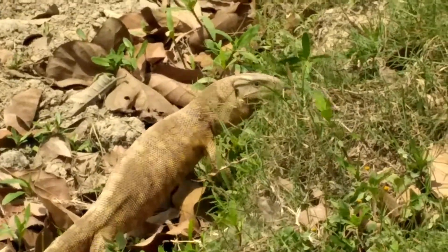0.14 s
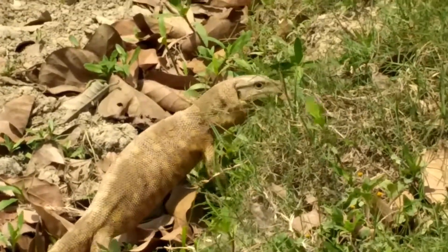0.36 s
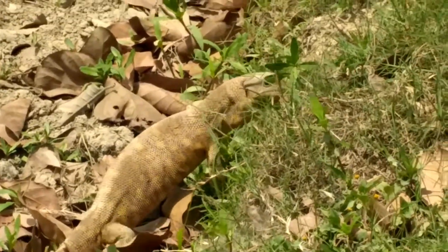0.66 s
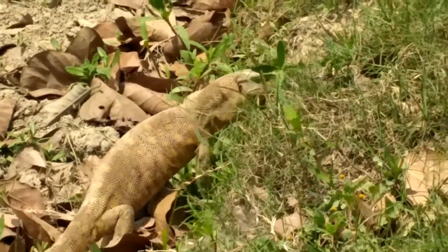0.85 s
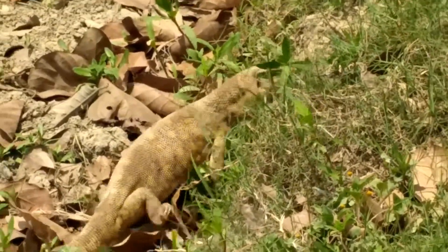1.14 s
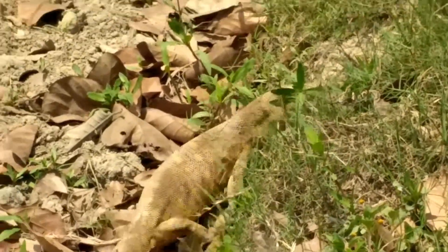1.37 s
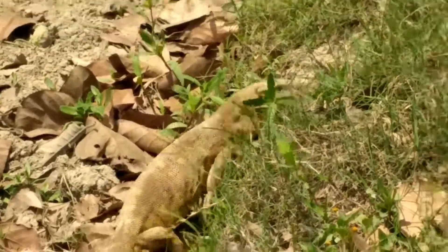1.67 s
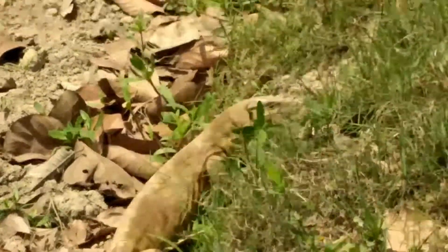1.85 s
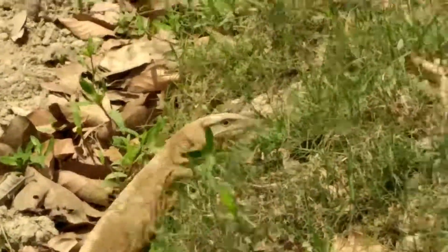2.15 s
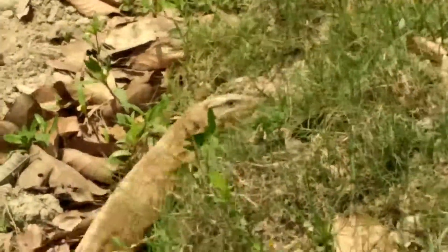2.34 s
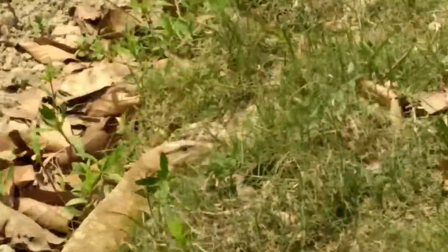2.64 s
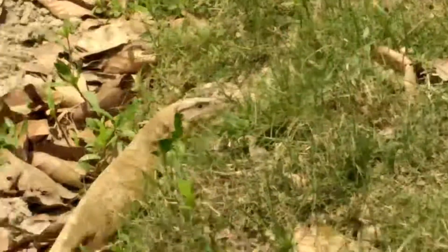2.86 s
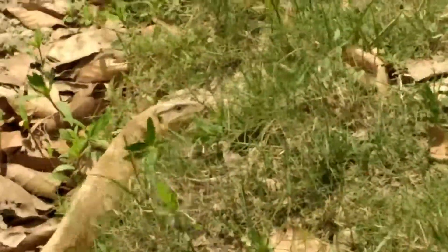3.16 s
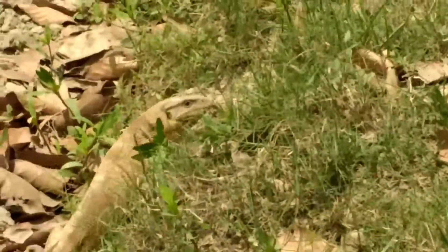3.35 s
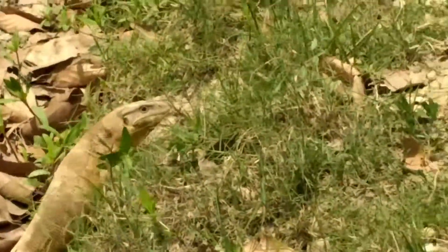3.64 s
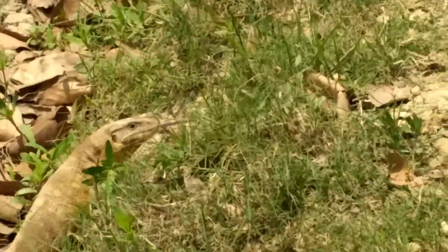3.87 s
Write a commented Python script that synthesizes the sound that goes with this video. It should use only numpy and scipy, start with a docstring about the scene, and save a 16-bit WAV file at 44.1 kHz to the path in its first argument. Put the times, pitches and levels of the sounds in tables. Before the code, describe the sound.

Dry leaves rustle and snap as a lizard crawls through grass outdoors: faint at first, a strong scrape after one second, scattered crackles later, while low wind thumps build on a single close microphone.

```python
"""A large lizard pushes through dry leaves and grass: shaped noise full of tiny crackles makes the scrapes,
short noise bursts with a rough ring make the leaf snaps, and decaying tones make one twig knock.
Gusts of wind buffet the single microphone in low lumpy bursts, made of noise in three bands.
Behind it all is a faint outdoor hiss of coloured noise that dips at times."""
import sys
import numpy as np
from scipy import signal
from scipy.fft import rfft, irfft, next_fast_len
from scipy.io import wavfile
from scipy.ndimage import uniform_filter1d, map_coordinates

SR = 44100
rng = np.random.default_rng(int(sys.argv[2]) if len(sys.argv) > 2 else 0)


def decibels_to_gain(level_db):
    """Convert a level in decibels to a linear amplitude gain (20 dB per decade)."""
    exponent = np.asarray(level_db, float) / 20
    return 10 ** exponent


def log_audio(samples):
    """Write samples as a 16-bit WAV file to the path given in sys.argv[1]."""
    # one column per channel
    frames = np.atleast_2d(samples).T
    # limit to full scale, then quantise
    limited = np.clip(frames, -1, 1)
    pcm = np.round(limited * 32767).astype(np.int16)
    wavfile.write(sys.argv[1], SR, pcm)


N = 176400  # samples, four seconds


def unit(x):
    """Scale to rms 1."""
    return x / np.sqrt(np.mean(x ** 2) + 1e-20)


def curves(rows):
    """Straight lines between the rows: one value per sample for each column after the time."""
    times, *columns = np.transpose(rows)
    t = np.arange(N) / SR
    return [np.interp(t, times, column) for column in columns]


def wobble(rate):
    """A smooth curve through random points, rate points a second (below 100)."""
    return map_coordinates(rng.standard_normal(400), [np.arange(N) * rate / SR])


def coloured(x, points):
    """Filter x to a spectrum of (Hz, dB) points; white noise of rms 1 keeps rms 1."""
    hz, db = np.transpose(points)
    size = next_fast_len(N + 8192)
    bins_hz = np.fft.rfftfreq(size, 1 / SR)
    # the points are joined along a logarithmic pitch axis
    gain = decibels_to_gain(np.interp(np.log(bins_hz + 1), np.log(hz + 1), db, left=-120, right=-120))
    return irfft(rfft(x, size) * unit(gain), size)[:N]


def even(x, window_s):
    """Noise with its own slow swells ironed out."""
    level = uniform_filter1d(x ** 2, int(window_s * SR))
    return unit(x / np.sqrt(np.abs(level) + 1e-9))


# Leaves dragged by the body: (start [s], end [s], treble at start [dB], treble at end [dB],
# middle at start [dB], top over treble [dB])
DRAGS = [(0, 0.149, -67.5, -79.5, -78, -9.5), (0.46, 0.583, -68, -64, -78, -8),
         (0.588, 0.673, -62.5, -52.5, -69, -18), (0.668, 0.767, -66, -57.5, -69.5, 9.5),
         (0.879, 0.953, -55.5, -69, -77, 5.5), (1.238, 1.529, -41, -44, -63.5, -12),
         (1.546, 1.628, -55, -65.5, -73.5, 0), (1.641, 1.735, -48.5, -71.5, -71.5, 5.5),
         (1.737, 2.15, -76, -69, -83, -23), (2.17, 2.596, -63, -83.5, -78, -12),
         (2.904, 2.95, -53, -60.5, -75, -14.5), (2.956, 3.055, -51, -67.5, -75, 1),
         (3.066, 3.17, -69.5, -72.5, -75, -3.5), (3.141, 3.382, -54.5, -73, -70, -1),
         (3.419, 3.61, -65.5, -84.5, -75, 0.5), (3.609, 3.641, -49.5, -75, -67, 17.5),
         (3.662, 3.774, -58, -84.5, -75, 10.5), (3.78, 3.954, -83.5, -81, -99, -2)]
DRAG_ATTACK_S, DRAG_RELEASE_S = 0.005, 0.011  # time constants of the start and of the fade after the end
STILL_DB = -86.5  # level between drags


def drags():
    """Treble, middle and top level in dB: each drag starts quickly, fades or grows and dies off after its end."""
    t = np.arange(N) / SR
    gain = np.zeros((3, N))
    for start, end, first_db, last_db, middle_db, top_db in DRAGS:
        treble_db = np.interp(t, [start, end], [first_db, last_db])
        # the middle follows only a third of the treble's change
        bands_db = np.array([treble_db, middle_db + 0.33 * (treble_db - first_db), treble_db + top_db])
        attack = 1 - np.exp(np.minimum(start - t, 0) / DRAG_ATTACK_S)
        release = np.exp(np.minimum(end - t, 0) / DRAG_RELEASE_S)
        gain += attack * release * decibels_to_gain(bands_db)
    return 20 * np.log10(gain + decibels_to_gain(STILL_DB))


# Grass blades brushing, a narrow sizzle: (time [s], level [dB])
GRASS = [(.66, -87), (.68, -69), (.8, -71), (.83, -89.5), (1.23, -89), (1.25, -54.5), (1.52, -69),
         (1.54, -97), (2.23, -75), (2.45, -82), (2.87, -98), (2.89, -64.5), (3.33, -58), (3.4, -73.5),
         (3.79, -70), (3.83, -101)]
# Tone of the bright scrape, also used by the snaps: (frequency [Hz], relative level per Hz [dB])
TREBLE_TONE = [(4410, -41), (7500, -5), (8360, -3), (9560, 2.5), (10900, 1.5), (12700, 8.5), (15100, 0),
               (15800, 6)]
# Tone of the duller scrape: (frequency [Hz], relative level per Hz [dB])
MIDDLE_TONE = [(760, -57), (1300, -12.5), (2850, -9.5), (3350, -5.5), (3840, -3.5), (5000, -7),
               (6500, -17.5), (11000, -120)]
# Tone of the thin fizz of the driest leaves: (frequency [Hz], relative level per Hz [dB])
TOP_TONE = [(11700, -26), (12100, 4), (13500, -1), (15800, -6)]
# Tone of the grass blades: (frequency [Hz], relative level per Hz [dB])
BLADES_TONE = [(4500, -42), (5000, -2), (6000, -4), (6300, -12), (7600, -9.5), (7900, -39)]
CRACKLES_PER_S, CRACKLE_SPREAD_DB = 250, 5  # average number drawn for each tone, spread of their sizes
CRACKLE_SHARE, CRACKLE_S = 0.34, 0.001  # part of the loudness that crackles, time constant of their decay


def rustle():
    """Leaves and grass rub: scraping noise that flares in tiny crackles of uneven size, in four tones."""
    levels_db = [*drags(), *curves(GRASS)]
    size_db = CRACKLE_SPREAD_DB * np.clip(rng.standard_normal((4, N)), -2, 2)
    crackles = decibels_to_gain(size_db) * (rng.random((4, N)) < CRACKLES_PER_S / SR)
    crackles = crackles + 0.43 * crackles[0]  # some crackles are heard in every tone
    flare = signal.lfilter([1], [1, -np.exp(-1 / (CRACKLE_S * SR))], crackles)
    loudness = CRACKLE_SHARE * unit(flare) + 1 - CRACKLE_SHARE
    rub = loudness * decibels_to_gain(2.8 * wobble(46)) * rng.standard_normal((4, N))
    tones = (TREBLE_TONE, MIDDLE_TONE, TOP_TONE, BLADES_TONE)
    return sum(coloured(unit(x) * decibels_to_gain(db), tone) for x, db, tone in zip(rub, levels_db, tones))


# Leaf snaps: (time [s], crack level before its rise and tone [dB], ring over crack [dB], ring pitch [Hz])
SNAPS = [(0.0839, -50.5, -3, 4090), (0.16, -54.5, 0, 3800), (0.292, -45, -18.5, 5370),
         (0.467, -29.5, -32, 4250), (0.5241, -34.5, -17, 4140), (0.5827, -56.5, 7, 4220),
         (0.6064, -38, -11, 3920), (0.6707, -35.5, 2, 3415), (0.6984, -38, -23, 4170),
         (0.749, -34, -15, 5530), (0.884, -34, -36, 3340), (0.908, -32, -28, 3600),
         (1.3016, -16, -21.5, 4570), (1.515, -29, -45, 3940), (1.5694, -31, -23, 2850),
         (1.6531, -18.5, -58, 4500), (1.714, -36, -32, 3580), (1.997, -30.5, -29, 3200),
         (2.166, -25.5, -20.5, 3630), (2.231, -36, -13, 5560), (2.304, -40, -30, 4360),
         (2.3602, -42.5, -4, 4420), (2.5599, -37, -18.5, 4160), (2.919, -32, -17.5, 5380),
         (2.9656, -22.5, -20.5, 5430), (2.9765, -30.5, -16, 5680), (3.0153, -39, -12, 4900),
         (3.023, -33.5, -11, 5100), (3.1558, -16, -20.5, 5370), (3.4286, -48, -5, 5200),
         (3.5035, -54.5, 10, 4350), (3.614, -32, -13, 4330), (3.6914, -45.5, -5, 5630),
         (3.7522, -48, -3, 4650), (3.8185, -45.5, -18.5, 4000)]
SNAP_RISE_S = 0.0029  # time constant of the rise
CRACK_S, LEAF_RING_S = 0.011, 0.021  # time to fall 60 dB


def snaps():
    """Each snap is a bright crack of noise and a short ring of the leaf, roughened by a jittery phase."""
    crack, ring = np.zeros((2, N + SR))
    t = np.arange(SR // 20) / SR
    rise = 1 - np.exp(-t / SNAP_RISE_S)
    for s, db, ring_db, hz in SNAPS:
        place = slice(round(s * SR), round(s * SR) + len(t))
        noise, jitter = rng.standard_normal((2, len(t)))
        crack[place] += decibels_to_gain(db - 60 * t / CRACK_S) * rise * noise
        phase = 2 * np.pi * hz * t + 0.26 * np.cumsum(jitter)
        ring[place] += decibels_to_gain(db + ring_db - 60 * t / LEAF_RING_S) * rise * np.sin(phase)
    ring_tone = [(1200, -28.5), (2000, -5.5), (7500, 1.0), (10000, -49.5)]
    return coloured(crack[:N], TREBLE_TONE) + coloured(ring[:N], ring_tone)


# Twig knock: (time [s], level that the parts below are set against [dB])
TWIG = [(2.417, -49.5)]
# Ringing tones of the wood: (frequency [Hz], level over the knock's [dB], time to fall 60 dB [s])
WOOD = [(1070, 6, 0.014), (1440, 8, 0.0094), (1770, 10, .012)]
SCUFF_DB, SCUFF_S = -3.5, 0.12  # grit against the knock's level before its tone, time to fall 60 dB


def twig():
    """A dull wooden knock of decaying sines with a short gritty scuff of noise behind it."""
    knock, grit = np.zeros((2, N))
    t = np.arange(SR // 5) / SR
    for s, db in TWIG:
        place = slice(round(s * SR), round(s * SR) + len(t))
        for hz, tone_db, fall_s in WOOD:
            knock[place] += decibels_to_gain(db + tone_db - 60 * t / fall_s) * np.sin(2 * np.pi * hz * t)
        grit[place] += decibels_to_gain(db + SCUFF_DB - 60 * t / SCUFF_S) * rng.standard_normal(len(t))
    grit_tone = [(900, -17.5), (1400, -0.5), (2500, -4.0), (4200, -14.5), (5000, -50.0)]
    return knock + coloured(grit, grit_tone)


# Steady wind on the microphone beneath the buffets: (time [s], rumble level [dB], flutter level [dB])
STEADY_WIND = [(0, -66, -84), (.25, -72, -91.5), (1.45, -62.5, -80), (2.1, -51, -68), (2.72, -37, -53),
               (2.9, -48.5, -78), (3.44, -38.5, -56.5), (3.52, -34, -43), (3.64, -36, -38),
               (3.75, -52.5, -56.5), (4, -61, -43.5)]
STEADY_BODY_DB = -11  # body of the steady wind over its rumble
# Buffets, eddies that strike the microphone: (peak time [s], body level [dB],
# rumble over body [dB], flutter over body [dB])
BUFFETS = [(0.03, -42, 3.5, -9.5), (0.323, -56.5, 5.5, -21), (0.472, -60, 14.5, -15),
           (0.523, -48.5, -3.5, -12.5), (0.636, -50, 1, -21), (0.721, -56, 3.5, -17), (0.892, -63, 5, -6),
           (1.064, -51, -15, -31), (1.123, -52, -8, -13), (1.22, -46.5, -2.5, -24), (1.288, -47, 5.5, -18),
           (1.326, -43.5, -34, -6), (1.511, -61, -21, 14.5), (1.542, -56.5, -14, 9), (1.573, -43.5, 1, -14),
           (1.616, -38.5, 4.5, -31), (1.707, -56.5, 20.5, -28), (1.848, -51, 10, -10),
           (1.873, -32.5, 10, -21), (1.97, -41, 6, -18), (2.033, -25, -2.5, -13.5),
           (2.072, -27.5, 3, -11.5), (2.141, -31.5, 4, -17), (2.192, -34.5, 6, -19.5),
           (2.268, -36, 10.5, -9), (2.355, -24, 3, -18), (2.406, -29, 0.5, -10.5), (2.467, -31, 0.5, -19),
           (2.542, -45, 12.5, -23), (2.611, -34.5, 3, -11.5), (2.668, -39.5, 9, 2), (2.707, -44.5, 3, 2.5),
           (2.754, -23.5, -1.5, -12.5), (3.009, -52.5, 21.5, -25), (3.067, -36.5, -21, -9),
           (3.114, -44.5, 18, -28), (3.157, -34.5, 11, -1.5), (3.213, -29.5, 1, -10),
           (3.328, -37, 16, -4.5), (3.377, -33, 6, -18), (3.485, -33, 1.5, 0), (3.505, -24, -4.5, -9.5),
           (3.537, -28.5, -8, -0.5), (3.575, -29.5, 0.5, -14), (3.65, -27.5, -14.5, -12),
           (3.694, -39.5, 2.5, -3.5), (3.754, -38.5, -8, -10), (3.823, -28, 2, 1), (3.857, -40.5, 11.5, 5),
           (3.876, -32.5, 6, 4.5), (3.927, -39, -2.5, 7), (3.96, -41, -15, 13), (3.98, -45.5, -22, 11)]
# (60 dB rise, 60 dB fall) of a buffet in each band, in seconds
RUMBLE_S, BODY_S, FLUTTER_S = (0.13, 0.17), (0.12, 0.1), (0.045, 0.091)
ROUND_S = 0.0035  # rounded top of a buffet


def wind_power():
    """Power of rumble, body and flutter: a steady flow plus buffets that swell and die around their peaks."""
    rumble_db, flutter_db = curves(STEADY_WIND)
    power = decibels_to_gain(2 * np.array([rumble_db, rumble_db + STEADY_BODY_DB, flutter_db]))
    t = np.arange(N) / SR
    for s, body_db, rumble_over, flutter_over in BUFFETS:
        near = slice(max(round(s * SR) - SR // 4, 0), round(s * SR) + SR // 4)
        from_peak = t[near] - s
        distance = np.hypot(from_peak, ROUND_S) - ROUND_S
        bands = zip(power, (rumble_over, 0, flutter_over), (RUMBLE_S, BODY_S, FLUTTER_S))
        for row, over_db, (rise, fall) in bands:
            slope_s = np.where(from_peak < 0, rise, fall)
            row[near] += decibels_to_gain(body_db + over_db - 60 * distance / slope_s) ** 2
    return power


# Tone of the lowest wind band: (frequency [Hz], relative level per Hz [dB])
RUMBLE_TONE = [(20, -18), (42, -13.5), (59, 5.5), (130, -6), (170, -67.5)]
# Tone of the middle wind band: (frequency [Hz], relative level per Hz [dB])
BODY_TONE = [(70, -23.5), (110, 1), (140, 10.5), (300, -8), (380, -17)]
# Tone of the upper wind band: (frequency [Hz], relative level per Hz [dB])
FLUTTER_TONE = [(220, -1), (300, 3.5), (500, -8), (800, -30), (1300, -52)]
# Tone of the rasp that strong flutter adds higher up: (frequency [Hz], relative level per Hz [dB])
RASP_TONE = [(550, 7.5), (800, -4), (1500, -31.5)]
QUICK_RATE, QUICK_DB = 80, 2.5  # random points a second of the small lumps, and their depth
RASP_DB = 14  # gain on the flutter's power


def wind():
    """Turbulence as three bands of noise; the rasp follows the flutter's power, so strong gusts rasp most."""
    power = wind_power()
    lumps_db = QUICK_DB * wobble(QUICK_RATE)
    noise = rng.standard_normal((4, N))
    rumble = even(coloured(noise[0], RUMBLE_TONE), 0.041)
    body = unit(decibels_to_gain(0.5 * lumps_db) * even(coloured(noise[1], BODY_TONE), 0.027))
    flutter = unit(decibels_to_gain(lumps_db) * even(coloured(noise[2], FLUTTER_TONE), 0.02))
    rasp = decibels_to_gain(lumps_db) * even(coloured(noise[3], RASP_TONE), 0.018)
    bands = np.sum(np.sqrt(power) * [rumble, body, flutter], axis=0)
    return bands + decibels_to_gain(RASP_DB) * power[2] * rasp


# Tone of the outdoor hiss: (frequency [Hz], relative level per Hz [dB])
HISS_TONE = [(350, -45.5), (600, -7), (892, -6.5), (2520, -14), (4360, -15.5), (6580, -17.5), (12700, -9.5),
             (15800, -15)]
# Rise and dip of the hiss, added to HISS_DB: (time [s], level [dB])
HISS_SWELL = [(0, 4.5), (.16, 0.5), (.28, -22), (.3, 5.5), (.98, 5), (1.0, -1.5), (1.05, -8), (1.07, 7.5),
              (2.6, 9.5), (2.85, 5.5), (2.9, 10.5), (3.8, -1), (4, 1)]
HISS_DB = -80.5  # level before the swell


def hiss():
    """Faint air: coloured noise whose level rises and dips at times."""
    swell_db = curves(HISS_SWELL)[0]
    return decibels_to_gain(HISS_DB + swell_db) * coloured(rng.standard_normal(N), HISS_TONE)


def scene():
    """All sources added up at one microphone."""
    return (rustle() + snaps() + twig() + wind() + hiss())[None]


def top_cut(x):
    """Nothing passes above the cut-off."""
    return signal.sosfilt(signal.butter(12, 16520, fs=SR, output="sos"), x)


def record(dry):
    """Turn the finished mix into the sound that is stored."""
    return top_cut(dry)


dry = scene()
out = record(dry)
log_audio(out)
```